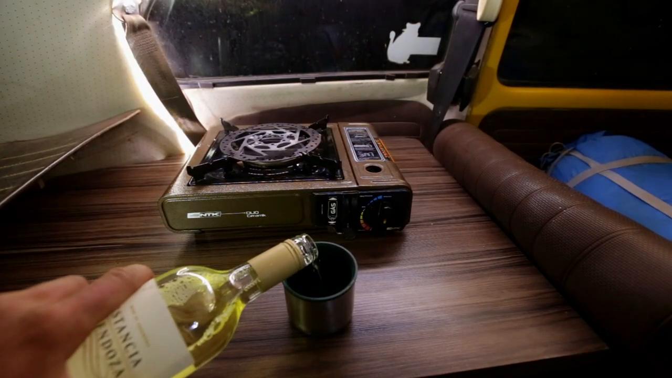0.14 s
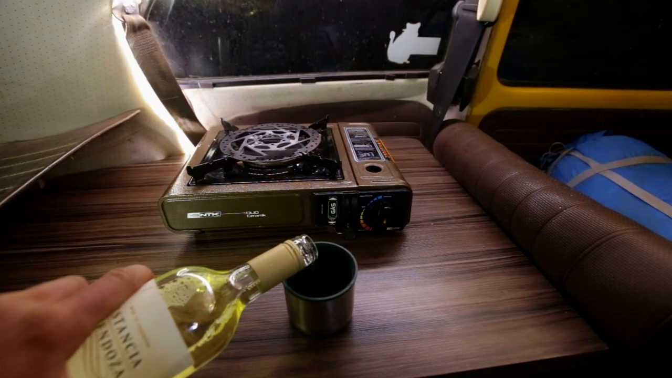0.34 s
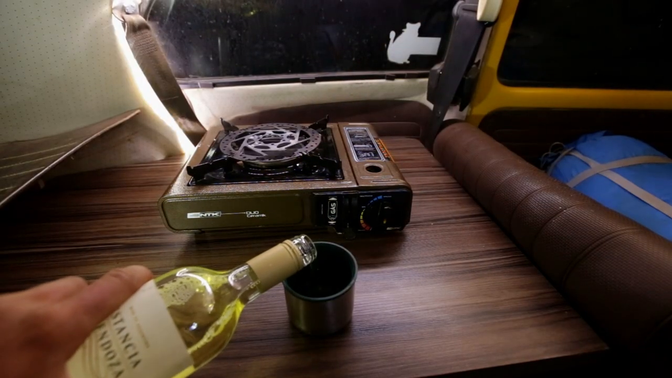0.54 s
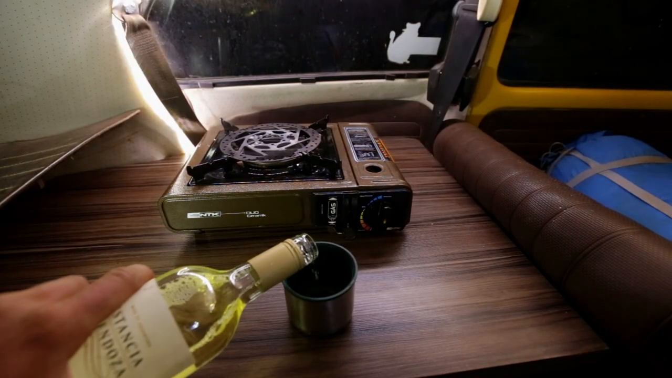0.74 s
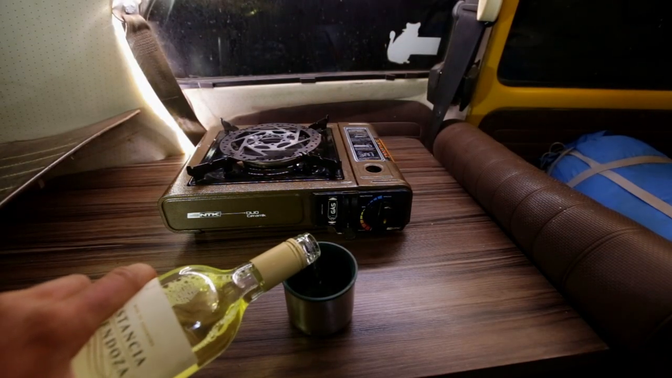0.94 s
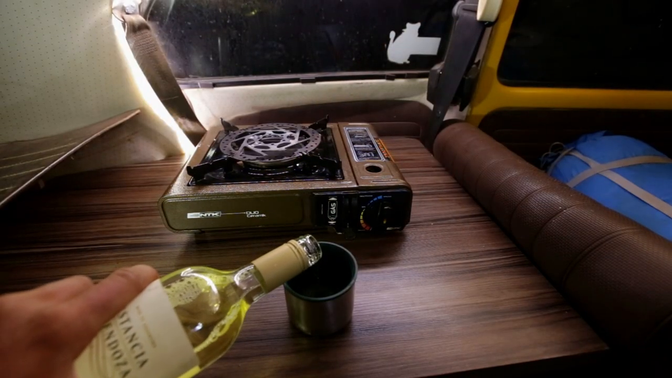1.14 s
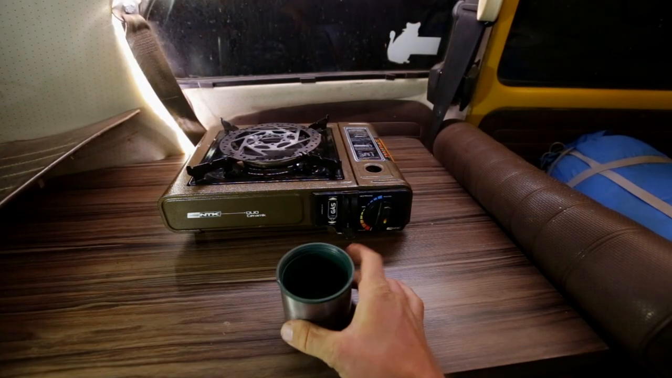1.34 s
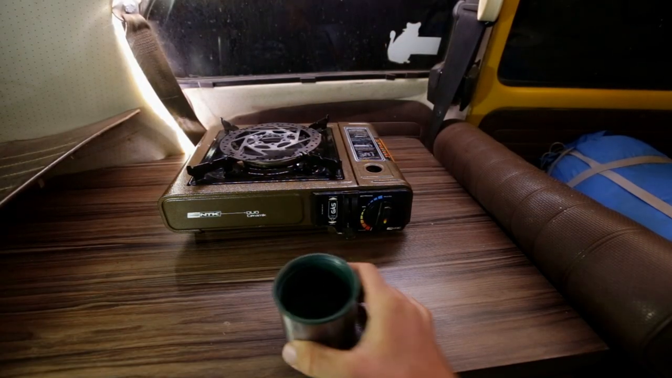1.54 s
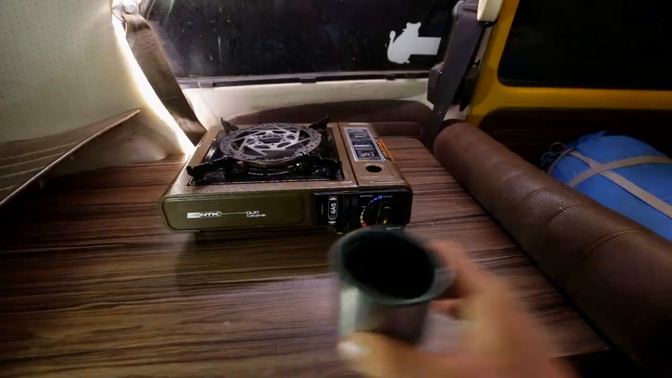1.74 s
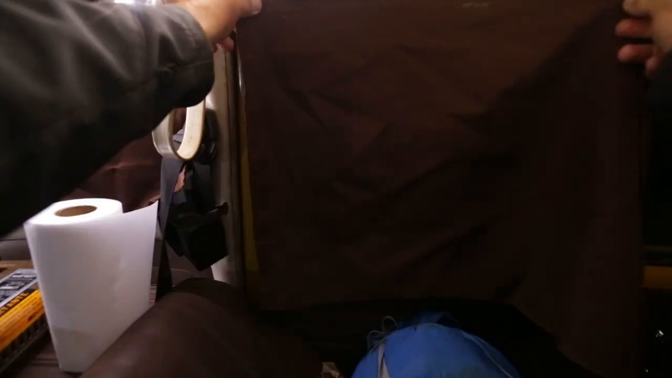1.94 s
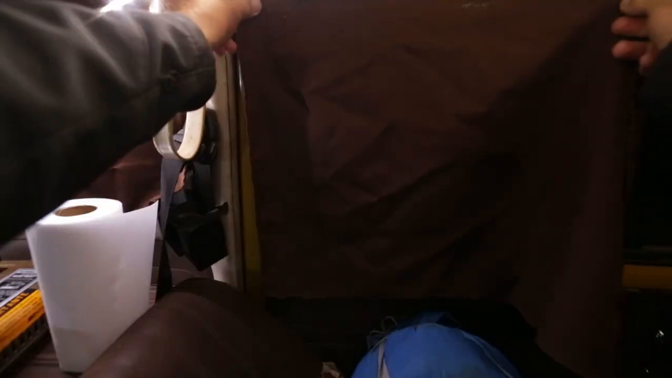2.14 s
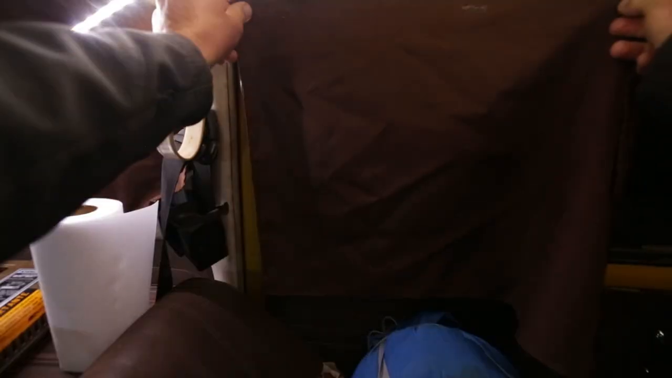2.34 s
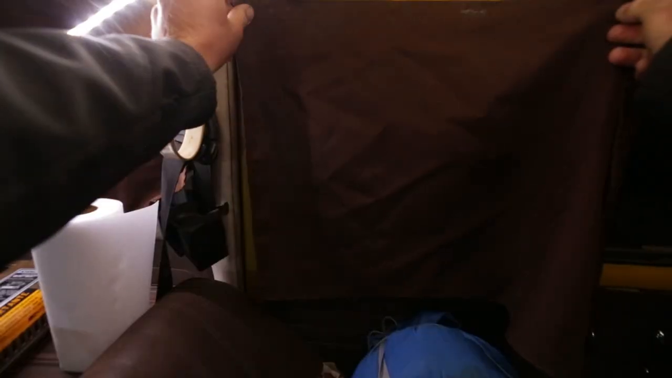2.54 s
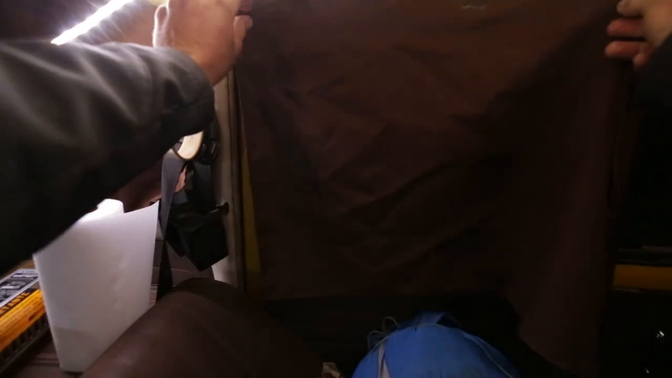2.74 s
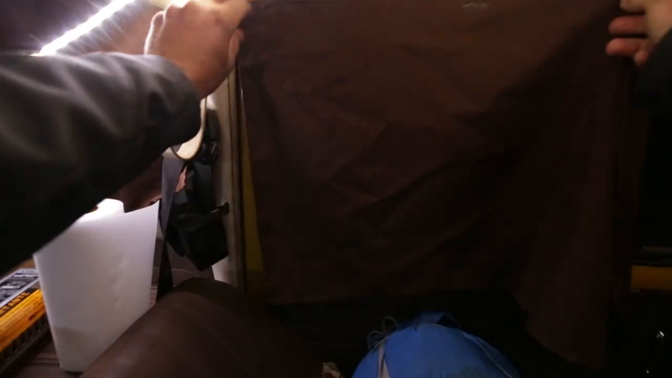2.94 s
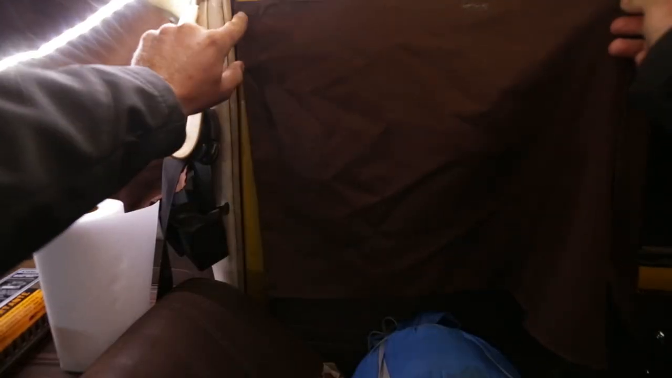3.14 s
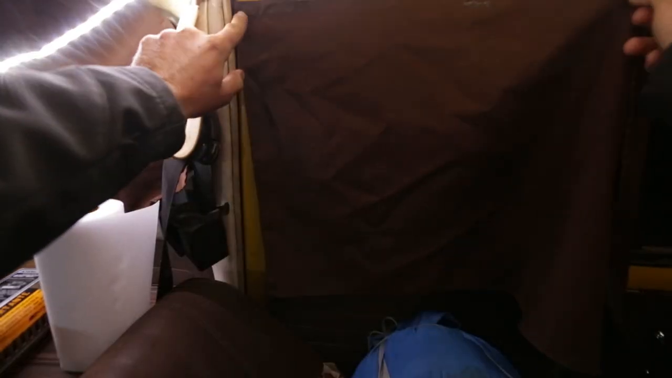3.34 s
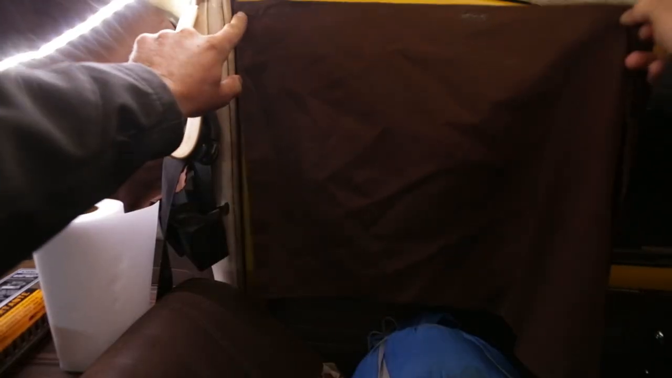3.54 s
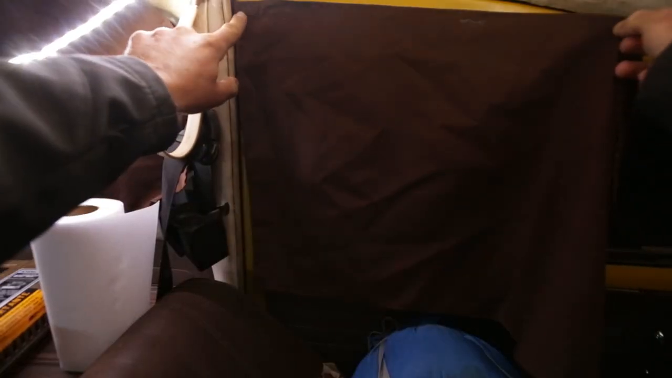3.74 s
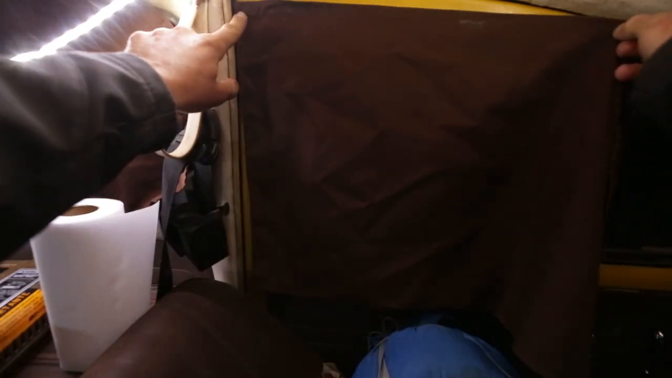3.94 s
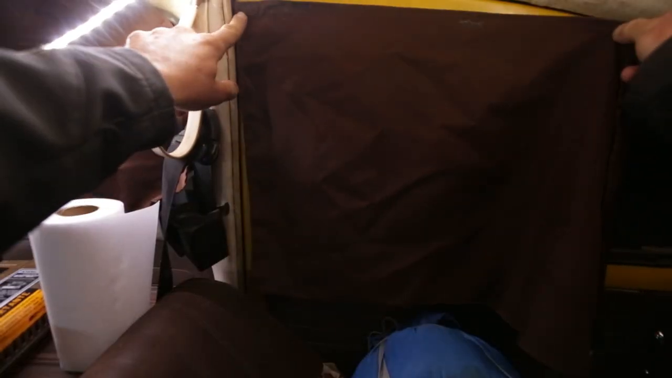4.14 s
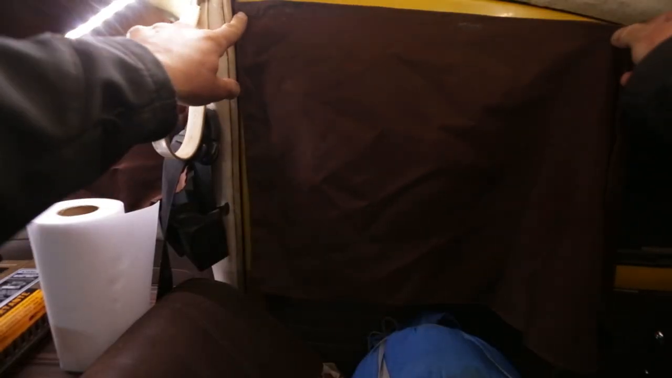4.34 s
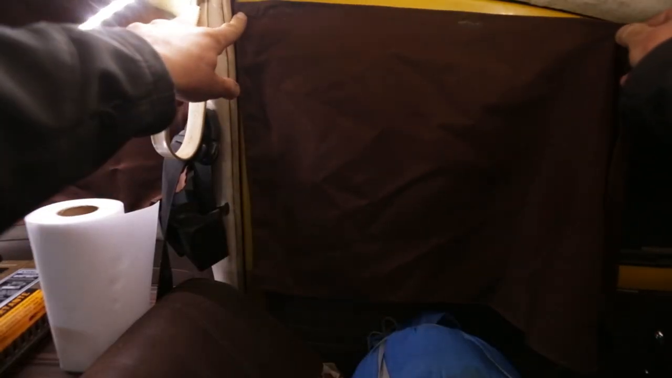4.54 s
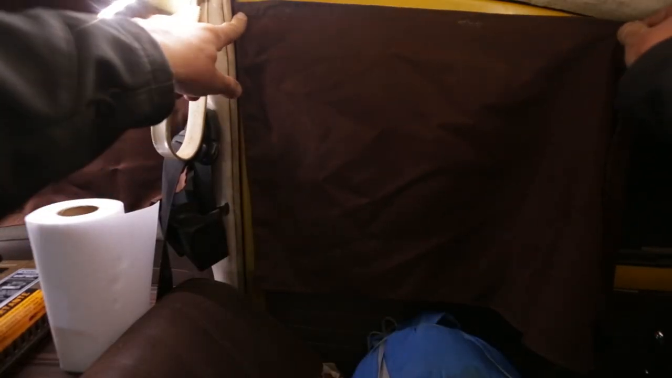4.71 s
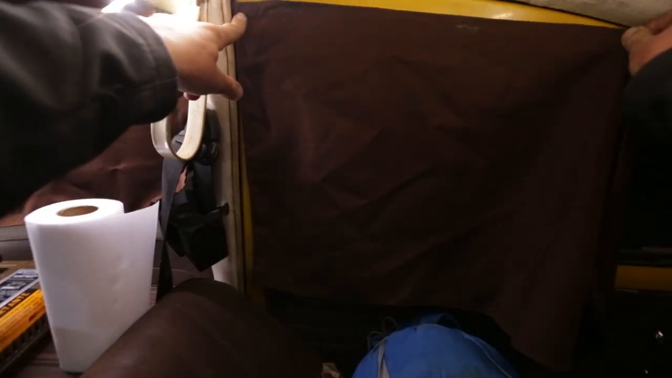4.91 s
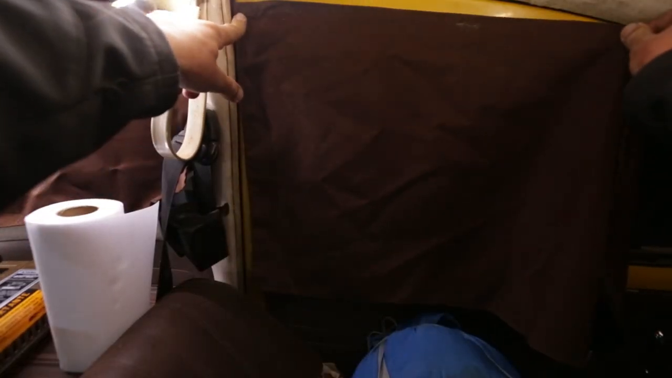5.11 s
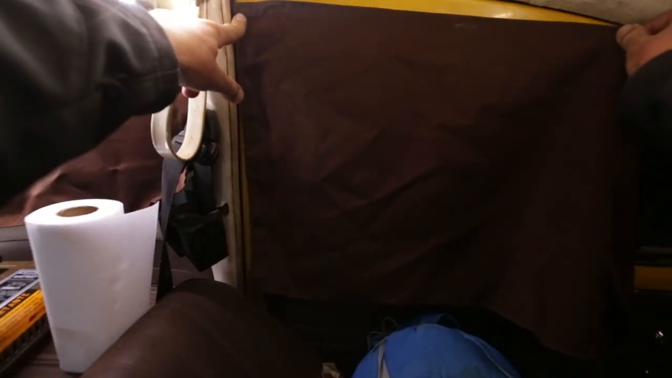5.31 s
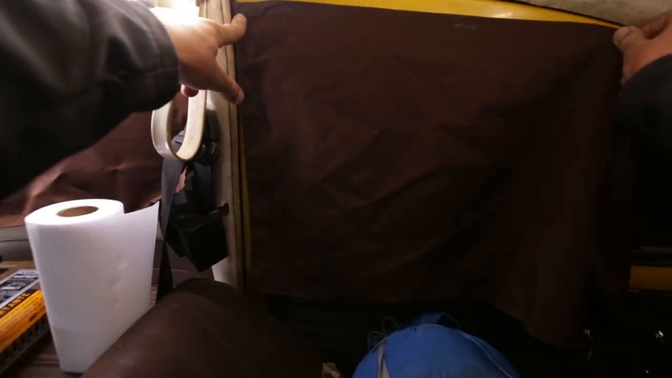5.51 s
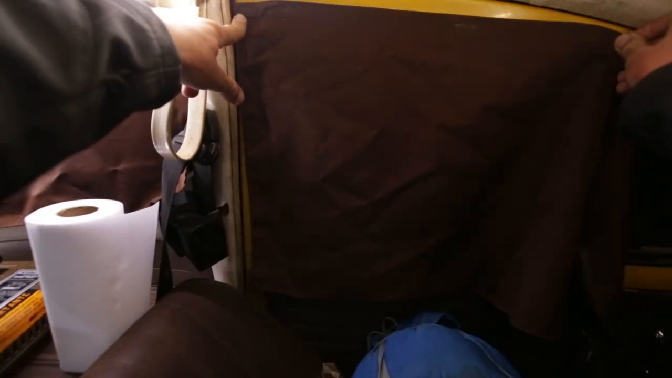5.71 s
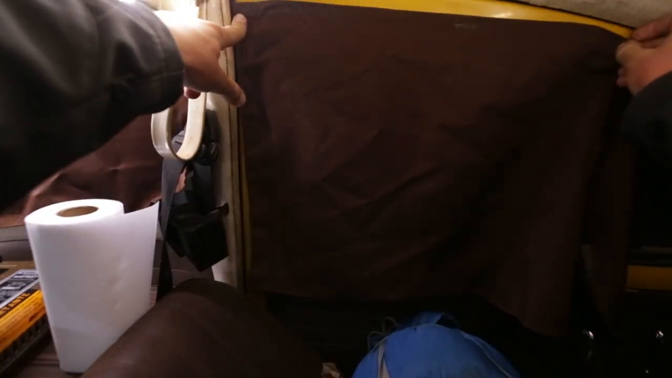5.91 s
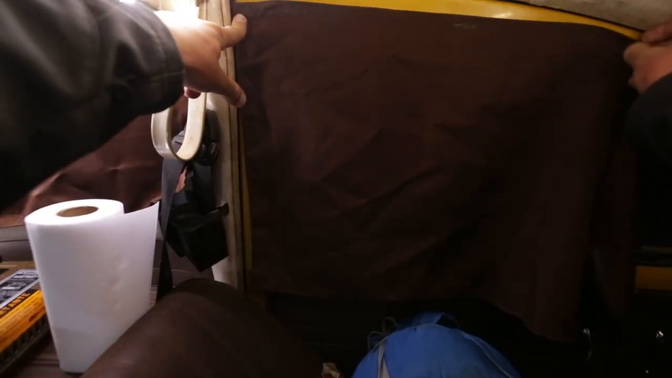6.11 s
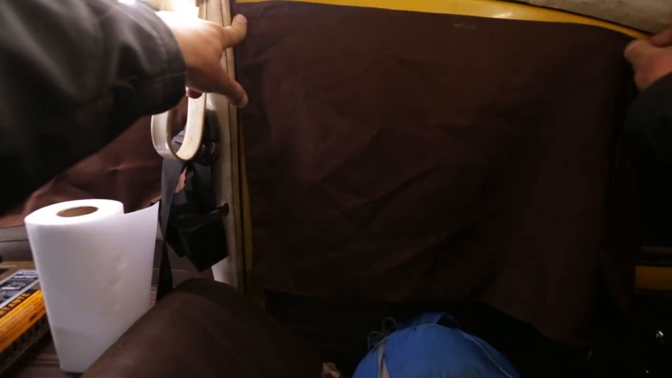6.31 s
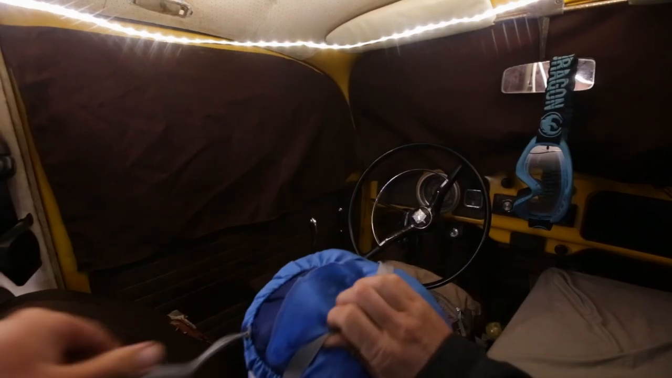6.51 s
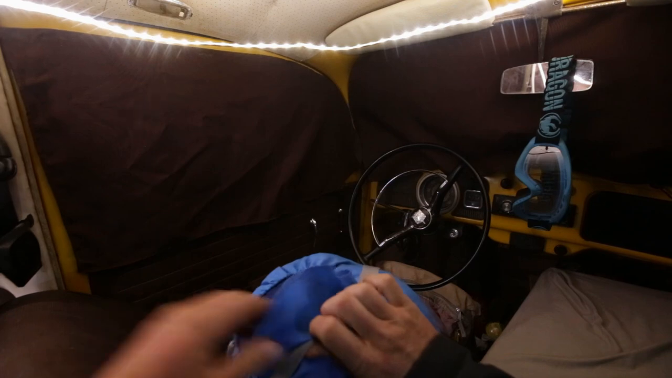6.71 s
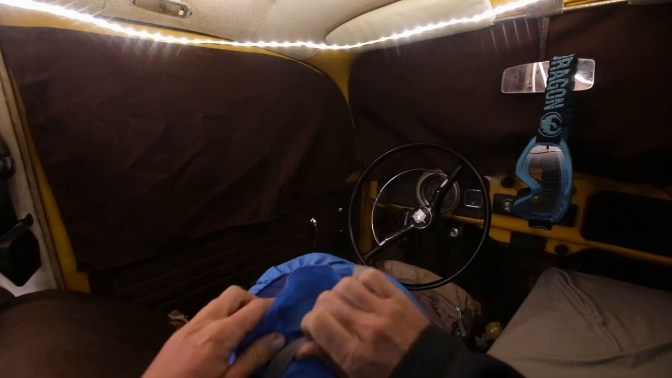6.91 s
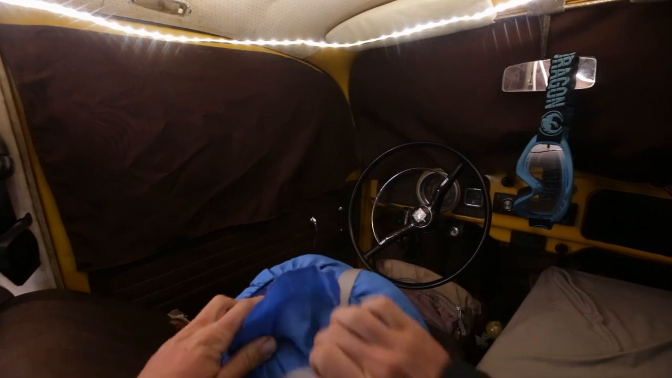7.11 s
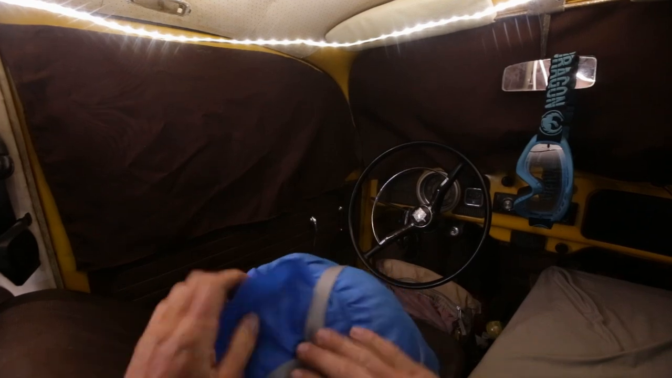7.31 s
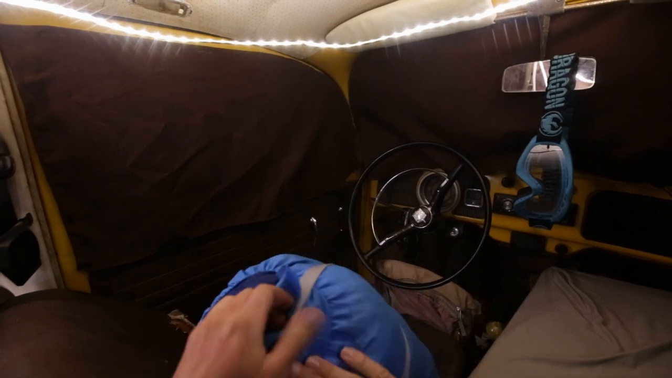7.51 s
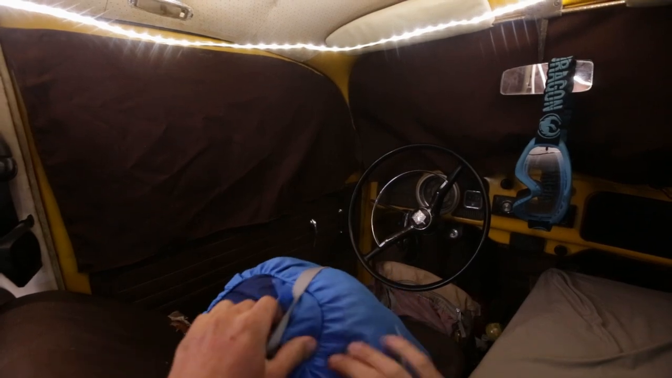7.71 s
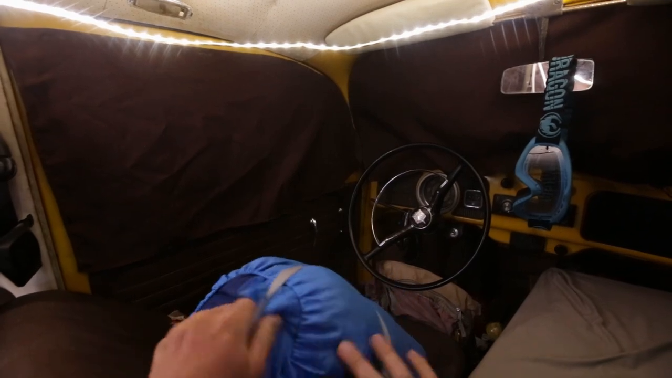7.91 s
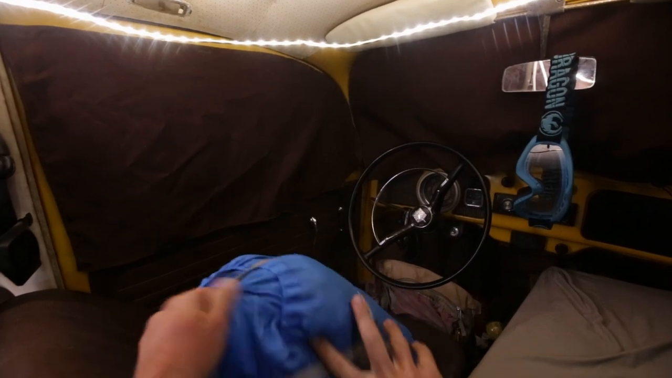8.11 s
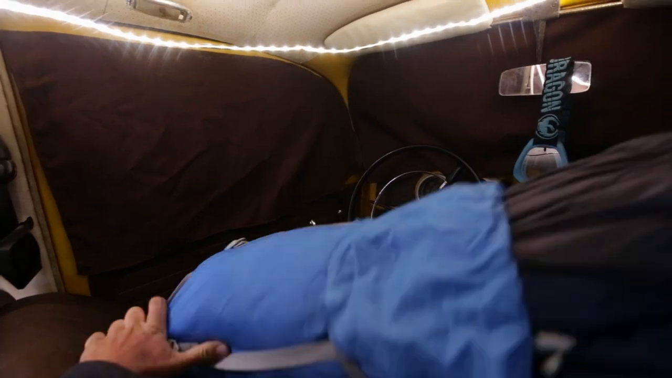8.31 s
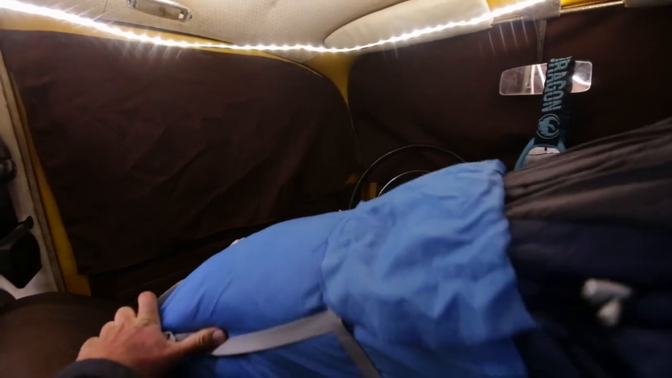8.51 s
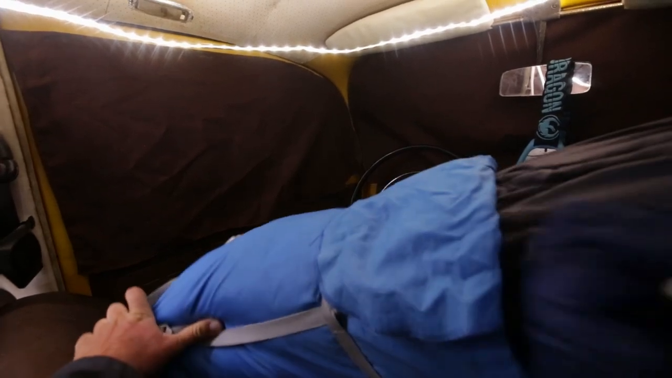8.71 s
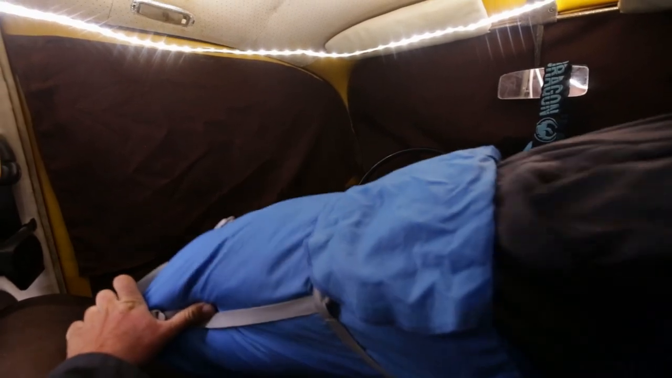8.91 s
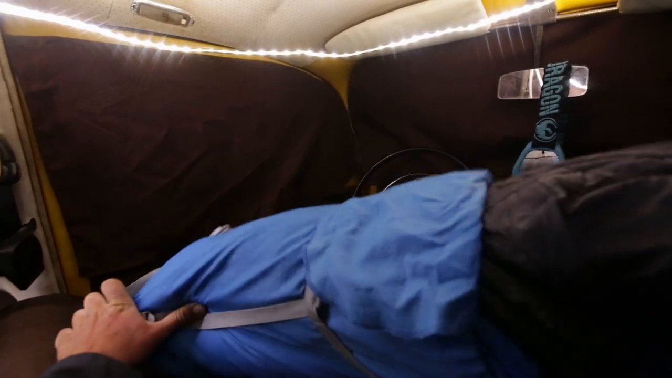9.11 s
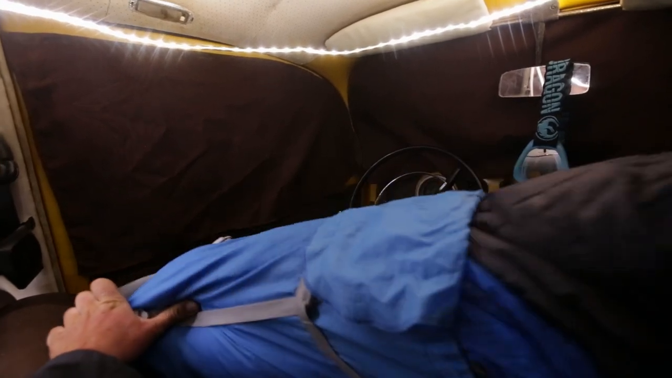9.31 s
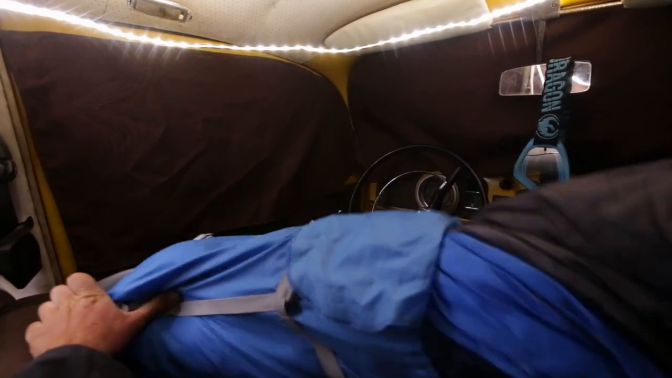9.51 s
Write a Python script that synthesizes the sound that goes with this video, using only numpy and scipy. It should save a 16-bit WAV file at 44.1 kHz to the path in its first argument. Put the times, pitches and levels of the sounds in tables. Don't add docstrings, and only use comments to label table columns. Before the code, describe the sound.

Close in a padded car: bubbly pouring into a metal cup, sharp magnetic clacks on bodywork, crinkling nylon, and a long fabric pull.

```python
import sys
import numpy as np
from scipy import signal
from scipy.fft import rfft, irfft
from scipy.io import wavfile
from scipy.ndimage import uniform_filter1d

SR = 44100
rng = np.random.default_rng(int(sys.argv[2]) if len(sys.argv) > 2 else 0)


def generate_wav(sig):
    pcm = np.round(np.clip(np.atleast_2d(sig).T, -1, 1) * 32767).astype(np.int16)
    wavfile.write(sys.argv[1], SR, pcm)


def invert_db(level):
    return 10 ** (np.asarray(level, dtype=float) / 20)


N = 421155
T = np.arange(N) / SR
BANDS_HZ = 50 * 2 ** np.arange(0, 8.4, 1 / 3)

# frequency in Hz, density in dB per Hz.
AIR_HZ_DB = [(8.8, -24), (15, -3), (190, -4), (233, -6), (277, -9), (321, -5.5), (361, -7.5), (646, -13),
             (816, -8), (1960, -12), (2330, -12.5), (14700, -15.5), (16000, -17)]
# frequency in Hz, density in dB per Hz.
HISS_HZ_DB = [(8.8, -41), (15, -1.5), (81, 0.5), (123, -9), (169, 1), (207, -5.5), (321, -4.5), (685, -9.5),
              (3720, -7.5), (14700, -8.5), (16000, -18)]
# frequency in Hz, t60 in seconds.
CABIN_HZ_T60_S = [(100, 1), (400, 0.36), (800, 0.13), (1600, 0.054), (3000, 0.058), (10000, 0.037)]
BLOW_HZ = (200, 900, 2700, 7500)

# time in seconds, level in dB.
POUR = [
    (0.0, -67),
    (0.072, -67),
    (0.38, -63.5),
    (0.698, -70),
    (1.3, -70.5),
]
# start in seconds, wall ring in dB, bubble pitch in Hz, bubble level in dB.
DROPS = [(0.0272, -54, 3500, -41), (0.0807, -72, 2600, -42), (0.0968, -61, 3000, -40),
         (0.1434, -56, 2600, -46), (0.1688, -51, 2800, -40), (0.212, -55, 1750, -68),
         (0.182, -58, 2000, -60), (0.235, -70, 3500, -51), (0.2633, -62, 2600, -53),
         (0.2997, -40, 2600, -39), (0.3393, -41, 3690, -38), (0.357, -41, 3200, -40),
         (0.392, -68, 3540, -35.5), (0.41, -38, 2020, -37), (0.444, -54, 2700, -41),
         (0.458, -43.5, 2020, -42), (0.488, -51, 2480, -40), (0.5275, -45.5, 2640, -50),
         (0.5504, -43, 2350, -46), (0.6055, -62, 3000, -49), (0.6858, -55, 2620, -51),
         (0.7153, -57, 3300, -55), (0.912, -65, 3300, -54), (1.02, -69, 3500, -45),
         (1.1553, -70, 2600, -56), (1.262, -56, 4000, -53), (0.652, -38.5, 2370, -37.5),
         (0.8584, -48, 2630, -41.5), (0.8775, -40, 1900, -52), (0.89, -38.5, 2350, -46),
         (0.932, -59, 1870, -39.5), (0.9637, -67, 2650, -47), (0.9848, -49, 3400, -56),
         (1.0077, -50, 2300, -47), (1.066, -47, 1840, -56), (1.088, -52, 1900, -52),
         (1.1943, -45.5, 1810, -47), (1.2109, -44, 2350, -44), (1.2296, -47.5, 1910, -48),
         (1.2467, -70, 1850, -43.5)]
# start in seconds, slap in dB.
GULPS = [
    (0.2129, -39),
    (0.357, -42.5),
    (0.392, -51),
    (0.651, -60),
    (1.0879, -59),
]
PLINKS_S = [.098, .12, .15, .17, .31, .407, .79]
# frequency in Hz, width in Hz, gain in dB.
CUP_MODES = [(203.6, 36, 2), (546, 57, -2), (713, 38, -6), (1000, 40, -31), (1310, 79, 7.5),
             (1910, 55, -20), (2660, 180, 1.5), (3260, 89, -9), (3520, 38, -20), (3620, 82, -18),
             (4500, 100, -28), (5300, 120, -27)]
# start in seconds, hold in seconds, rumble in dB, wall ring above it in dB.
SLIDE = [
    (1.335, 0.011, -57, 2),
    (1.39, 0.011, -61, 1),
    (1.49, 0.0085, -58, 11),
    (1.51, 0.03, -54, -14),
    (1.58, 0.062, -73, -20),
]

# start in seconds, peak at 1 kHz in dB, 200 Hz above it in dB, 2.6 kHz above it in dB.
TAPS = [(1.772, -54, -39, -7), (2.205, -49.5, 7.5, -29), (2.457, -46, -42, -4),
        (2.594, -57, -31, 4), (2.756, -55, -8, 3), (2.782, -54, 1, 23.5), (2.862, -59, 1, 2),
        (2.89, -56, -22, 2), (4.154, -45.5, -1, 3.5), (4.76, -62, -30, 18), (4.83, -47.5, -22, 6),
        (5.677, -44.5, -35, -2), (5.888, -40.5, -39, -19), (6.04, -57.5, -28, 7),
        (6.125, -65, -20, 18.5), (6.183, -58, -7, 3), (6.308, -42, -14, -7), (6.331, -36.5, -17, -1),
             (6.343, -41.5, -13, 0), (6.357, -51, -23, 18), (6.38, -36, -12, 2.5), (6.459, -47, 5.5, 4),
             (6.477, -42, -29, -10), (6.565, -41, -18, -1), (6.615, -55, -29, -22), (6.629, -40, -28, -12),
             (6.6795, -32.5, -5, -9), (6.6978, -34, -10, -9), (6.779, -38.5, -36, -19),
             (6.81, -37.5, -23, -6), (6.915, -39, -30, -22), (6.947, -54, -17, 13.5), (7.116, -50, -35, 8),
             (8.199, -33.5, -21, 2.5)]
# start in seconds, peak in dB, pitch in Hz.
KNOCKS = [(6.041, -52, 810), (6.428, -46, 560), (6.478, -50, 1000), (6.6155, -44, 775), (6.6295, -38, 730),
          (6.6808, -35, 616), (6.6985, -33, 477), (6.782, -44, 700), (6.812, -42.5, 600),
          (6.916, -39.5, 660)]

SNAP_S = [(1.9018, 1.9168), (3.8612, 3.8748, 3.8855), (5.2745, 5.279, 5.3135), (5.3165, 5.3186), (1.9252,),
          (3.8925,), (4.162,), (1.9216,)]
# peak at 1 kHz in dB, then 200 Hz, 2.6 kHz and 7 kHz above it in dB.
SNAPS = [
    [(-38.5, -22.5, -8.5, -14.5), (-14, -16, 2.5, -18.5)],
    [(-38, -43, 2, -26), (-42.5, -38, 12, -3), (-16.5, -29, 1.7, -11.5)],
    [(-29, -22, -1, -12.5), (-21.5, -25, -8, -19), (-30, -30, 1, -9)],
    [(-31.5, -26, -10, -17), (-26.5, -25, -9, -20)],
    [(-23.5, -22.5, -15.5, -24)],
    [(-32.5, -19, -11, -15)],
    [(-51, 5, -15, -25)],
    [(-30, -30, 3, -12)],
]
# frequency in Hz, level in dB, t60 in seconds.
PANELS = [
    [(388, -13.5, 0.28), (434, -24, 0.25), (490, -23.5, 0.06), (628, -9, 0.13), (716, -22, 0.032),
     (835, -15.5, 0.05), (1000, 2.5, 0.015), (1200, -17.5, 0.06), (1448, -12.5, .025), (1570, -7.5, 0.033),
     (2350, -8.5, 0.023), (2480, 12, 0.011), (3000, -6, .03)],
    [(389, -6, 0.29), (560, -37, 0.0567), (663, -1.5, 0.085), (678, -19, 0.073), (1050, -1, 0.039),
     (1250, -10, .015), (1510, -21, 0.048), (2000, -14.5, 0.05), (2700, -35, 0.035), (3000, -31.5, 0.02),
     (4160, 0.5, 0.014), (4450, 12, 0.012), (5170, 15.5, 0.019)],
    [(388.6, -5, 0.25), (543, -8, 0.077), (660, -17, 0.063), (865, -10, 0.018), (1040, -4, 0.052),
     (1290, -21, 0.063), (1590, 4.5, 0.034), (2340, -1.5, 0.034), (3300, -8, 0.025)],
    [(840, -14, 0.12), (880, 3.5, 0.032), (1008, -10.5, 0.09), (915, -29, 0.26), (1614, -14, 0.05)],
    [(640, -1, .04), (700, 3.5, .06), (880, -17.5, .14)],
    [(600, -2, .04), (653, 3, 0.066), (720, -5.5, 0.041)],
    [(345, 0.5, 0.19), (305, -4.5, 0.24), (700, -11, 0.1), (760, -18, .09)],
    [(1470, 0, .02), (1610, -3.5, .03), (2250, -1, 0.023), (3300, -2, 0.016)],
]
PANEL_DB = (-12, -21, -12, 4.5, -5, -1.5, 3.5, 7.5)

# start in seconds, peak
# in dB, pitch in Hz.
THUMPS = [(1.93, -47, 192), (2.206, -45.5, 140), (2.794, -47, 136), (3.049, -56, 118), (3.168, -59, 51.5),
          (3.219, -63, 51.6), (4.163, -47, 200), (5.286, -41.5, 177), (5.467, -51, 199), (6.327, -50, 123),
          (6.352, -45, 125), (6.457, -45, 140), (6.681, -52, 188), (6.809, -43.5, 149), (7.57, -57, 117),
          (6.385, -52, 130), (8.195, -47, 150), (8.366, -54, 121)]

# frequency in Hz, density in dB per Hz.
WEAVE_HZ_DB = [(24, -56), (40, -33), (115, -12.5), (320, -6.5), (412, 2), (680, -3.5), (1070, 0),
               (2000, -1), (2380, 0.5), (3740, -7), (9940, -31), (12100, -31), (16000, -41)]
# frequency in Hz, density in dB per Hz.
SACK_HZ_DB = [(24, -51), (40, -24.5), (124, -8.5), (231, -6.5), (770, -1.5), (918, -0.5), (2770, 0.5),
              (4340, -6.5), (5050, -8.5), (5720, -23), (6330, -18.5), (16000, -47.5)]
# time in seconds, level in dB.
CURTAIN = [(1.97, -80.5), (2.3, -78), (2.9, -77.5), (3.8, -80.5), (4.6, -78), (5.7, -76.5), (6.15, -68)]
# start in seconds, hold in seconds, level in dB, dull part above it in dB.
BRUSHES = [(1.97, 0.013, -69.5, 18), (2.23, 0.041, -70.5, 5), (2.38, 0.19, -72.5, -5),
           (2.77, .01, -65.5, -8), (2.845, 0.035, -66, -9), (3.13, 0.062, -70, 3.5), (4.43, 0.026, -73, -6),
           (4.77, .01, -71, -6), (4.83, 0.017, -65.5, -7)]
# start in seconds, hold in seconds, level in dB, treble above it in dB.
GRABS = [(6.29, .095, -55, -13), (6.41, 0.09, -65, -4), (6.575, 0.011, -59, -14), (6.655, 0.019, -55, -8.5),
         (6.785, 0.01, -53, -15), (6.875, 0.0054, -53.5, -16), (6.95, 0.0078, -48.5, -14),
         (7.02, 0.074, -49, -18), (7.13, 0.1, -47.5, -12.5), (7.3, 0.035, -53, -14),
         (7.37, 0.0047, -48.5, -12.5), (7.43, 0.06, -49.5, -16.5), (7.575, 0.015, -50, -21)]
# time in seconds, level in dB, treble above it in dB.
PULL = [(7.62, -60, -18), (7.7, -54, -12), (7.77, -48, -9), (7.82, -49, -12.5), (7.93, -51.5, -16),
        (7.96, -48, -11), (8.1, -51, -14.5), (8.18, -49.5, -11.5), (8.27, -47.5, -11.5), (8.35, -38, -15),
        (8.55, -41.5, -12.5), (8.67, -40, -14.5), (8.75, -42.5, -16), (9.02, -39, -13.5),
        (9.18, -41, -14.5), (9.55, -37, -11.5)]
# frequency in Hz, sharpness (Q).
SHADOWS = [(4300, 4), (5850, 6), (7400, 9)]
SACK_S, SMOOTH_S, PULL_S = 6.15, 6.98, 8.29

# start in seconds, length in seconds, pitch in Hz, level in dB.
SQUEAK = [(2.418, .032, 1080, -44.5)]
# start in seconds, peak in dB.
SNICKS = [(6.7416, -40), (6.769, -36), (6.7874, -43), (6.8523, -38), (6.933, -41), (6.9456, -38),
          (6.952, -38), (6.9574, -35), (7.0164, -38), (7.1171, -32), (7.3004, -38), (7.3662, -35.5),
          (7.4225, -35), (7.568, -35.5), (7.67, -44), (7.6866, -38), (7.9438, -41), (8.2003, -33),
          (8.2394, -37), (8.3507, -37), (8.3594, -38), (8.8914, -37)]


def unit(x):
    return x / np.sqrt(np.mean(x ** 2))


def on_log(hz, table):
    f, v = np.transpose(table)
    return np.interp(np.log(hz), np.log(f), v)


def curve(rows):
    s, db, *rest = np.transpose(rows)
    level = np.interp(T, s, invert_db(db), left=0, right=0)
    return [level] + [np.interp(T, s, c) for c in rest]


def band(x, hz):
    sos = signal.butter(2, [hz / 2 ** (1 / 6), hz * 2 ** (1 / 6)], "band", fs=SR, output="sos")
    return signal.sosfilt(sos, x) * np.sqrt(SR / 2 / (.25 * hz))


def no_bass(x, hz):
    return signal.sosfilt(signal.butter(3, hz, "high", fs=SR, output="sos"), x)


def ring(x, hz, t60_s):
    pole = np.exp(2j * np.pi * hz / SR - np.log(1000) / (t60_s * SR))
    return signal.lfilter([1], [1, -pole], x).imag


def resonate(x, modes):
    out = 0
    for hz, width_hz, db in modes:
        t60_s = np.log(1000) / (np.pi * width_hz)
        out = out + invert_db(db) * width_hz * 2 * np.pi / SR * ring(x, hz, t60_s)
    return out


def ticks(s, size):
    x = np.zeros(N)
    np.add.at(x, np.clip((np.asarray(s) * SR).astype(int), 0, N - 1), size)
    return x


def fade(x, t60_s):
    return signal.lfilter([1], [1, -np.exp(-np.log(1000) / (t60_s * SR))], x)


def walk(rate_hz):
    k = int(SR / rate_hz)
    steps = np.repeat(rng.standard_normal(N // k + 1), k)
    return unit(uniform_filter1d(steps, k)[:N])


def coloured(table):
    hz = np.maximum(np.fft.rfftfreq(N, 1 / SR), 1)
    return unit(irfft(rfft(rng.standard_normal(N)) * invert_db(on_log(hz, table)), N))


def crackle(rate_hz, spread_db):
    chance, sign, size = rng.random((3, N))
    return unit((chance < rate_hz / SR) * np.sign(sign - .5) * invert_db(-spread_db * np.log(size + 0.031)))


def cabin(x, echo_db, t60_s):
    t = np.arange(2048) / SR
    sparse = rng.standard_normal(len(t)) * (rng.random(len(t)) < .08)
    echoes = sparse * invert_db(-60 * t / t60_s) * (t > .0012)
    echoes = echoes * invert_db(echo_db) / np.sqrt(np.sum(echoes ** 2))
    echoes[0] = 1
    return signal.fftconvolve(x, echoes)[:N]


def blows(rows, hold_s, shorten, gain_db, top_db, click, size=N, longest_s=1):
    s, db, low_db, high_db, top_tilt_db = np.transpose(rows)
    out, hold = np.zeros(N), max(int(hold_s * SR), 1)
    points = np.transpose([low_db, 0 * db, high_db, top_tilt_db])
    for hz in BANDS_HZ[4:]:
        tilt_db = [np.interp(np.log(hz), np.log(BLOW_HZ), p) for p in points]
        edge_db = -14 * max(np.log2(160 / hz), 0) + top_db * max(np.log2(hz / BLOW_HZ[-1]), 0)
        hit = ticks(s, invert_db(db + tilt_db + edge_db + gain_db))[:size]
        t60_s = min(shorten * on_log(hz, CABIN_HZ_T60_S), longest_s)
        shape = fade(hit, 0.82 * t60_s)
        rattle = np.cumsum(shape)
        rattle[hold:] = rattle[hold:] - rattle[:-hold]
        shape = shape + 1.4 * rattle / hold + 0.2 * fade(hit, 3.0 * t60_s)
        lead = int(SR / max(hz, 700))
        out[:size] += np.roll(band(shape * rng.standard_normal(size), hz), -lead)
    for k, (hz, tilt_db) in enumerate(zip(BLOW_HZ, [low_db, 0 * db, high_db, top_tilt_db - 4])):
        wide = signal.butter(2, [hz / 1.8, hz * 1.8], "band", fs=SR, output="sos")
        sign = (-1) ** k
        edge = sign * click * 2 * SR / hz * ticks(s, invert_db(db + tilt_db + gain_db))
        out += signal.sosfilt(wide, edge)
    return out


def bubble(x, s, hz, db, t60_s, glide):
    t = np.arange(int(t60_s * SR)) / SR
    i = int(s * SR)
    x[i:i + len(t)] += invert_db(db - 60 * t / t60_s) * np.sin(2 * np.pi * hz * t * (1 + glide * t / t60_s))


def strokes(rows, rise_db_s, fall_db_s):
    s, hold_s, db, colour_db = np.transpose(rows)[:, :, None]
    t = T[::32]
    rise_db = rise_db_s * np.maximum(s - t, 0)
    fall_db = fall_db_s * np.maximum(t - s - hold_s, 0)
    return invert_db(db - rise_db - fall_db), colour_db


def blend(gains, colour_db, under, under_db):
    t = T[::32]
    power = np.interp(T, t, np.sum(gains ** 2, axis=0)) + under ** 2 + 1e-18
    tint = np.interp(T, t, np.sum(gains ** 2 * colour_db, axis=0)) + under ** 2 * under_db
    return np.sqrt(power), tint / power


def air():
    return invert_db(-68) * coloured(AIR_HZ_DB)


def hiss():
    return invert_db(-70.5) * coloured(HISS_HZ_DB)


def wine_bubbles(flow):
    s, _, hz, bubble_db = np.transpose(DROPS)
    fizz = np.zeros(N)
    for at, f, db, (u, v) in zip(s, hz, bubble_db, rng.random((len(s), 2))):
        bubble(fizz, at, f, db - 8.5, t60_s=0.021, glide=0.082)
        bubble(fizz, at + 0.0049 * u, 1600 * 2 ** (1.3 * v), db - 24.0, t60_s=0.0089, glide=0.16)
    for at in PLINKS_S:
        bubble(fizz, at, 5220, -59.5, t60_s=.014, glide=.02)
    for u, v, w, late in rng.random((170, 4)):
        at = s[int(u * len(s))] - .025 * np.log(late + .02)
        db = 2.5 - 4 * np.log(w + .05) + 20 * np.log10(flow[int(at * SR)] + 1e-9)
        octaves = (1.3 - .4 * at) * v ** 1.5
        bubble(fizz, at, 2100 * 2 ** octaves, db, t60_s=0.013, glide=.15)
    return fizz


def cup_wall():
    s, ring_db, _, _ = np.transpose(DROPS)
    gulp_s, gulp_db = np.transpose(GULPS)
    wall = np.zeros(N)
    for at, db, (u, v) in zip(s, ring_db, rng.standard_normal((len(s), 2))):
        bubble(wall, at, 1280 * (1 + .012 * u), db - 5, t60_s=.05 * invert_db(2 * v), glide=.005)
    return wall + ring(ticks(gulp_s, invert_db(gulp_db - 4)), 970, 0.026)


def pour():
    s, ring_db, _, bubble_db = np.transpose(DROPS)
    gulp_s, gulp_db = np.transpose(GULPS)
    flow, = curve(POUR)
    slap_db = -52 + 0.89 * (ring_db + 51.0)
    slap = ticks(s, invert_db(slap_db)) + ticks(gulp_s, invert_db(gulp_db))
    stream = flow * crackle(500, 4.8)
    push = invert_db(34.0) * slap + invert_db(17.0) * stream
    table = 0
    for hz, width_hz, db in CUP_MODES[:4]:
        foot = resonate(push, [(hz, width_hz, db)])
        table = table + resonate(foot, [(hz, 2.0 * width_hz, 0)])
    metal = resonate(invert_db(5) * stream * invert_db(4 * walk(40)), CUP_MODES[4:])
    splash = np.transpose([s, ring_db, -22 + 0 * s, bubble_db - ring_db, -22 + 0 * s])
    spray = blows(splash, 0.0075, 0.32, -19, -8, 0.18, size=2 * SR)
    wet = cabin(wine_bubbles(flow) + metal, -2.5, 0.055)
    return no_bass(wet + no_bass(cup_wall(), 770) + table, 188) + no_bass(spray, 1450)


def slide():
    gains, colour_db = strokes(SLIDE, rise_db_s=280, fall_db_s=400)
    rumble, sing_db = blend(gains, colour_db, 0, 0)
    slips = crackle(2500, 2.4)
    soft = rumble * unit(fade(slips, 0.0016))
    body = resonate(soft, [(215, 15, 13.0), (273, 55, 5.5), (566, 45, 5.2), (850, 150, 5.1), (1000, 58, 2.1)])
    sing = unit(no_bass(resonate(slips, [(1316, 61, 0)]), 1800))
    rasp = unit(resonate(slips, [(2370, 680, 0), (2790, 650, -1), (3500, 470, 4), (5200, 1100, -11)]))
    return no_bass(body + rumble * (invert_db(-6) * rasp + invert_db(sing_db - 6.5) * sing), 200)


def taps():
    rows = np.array(TAPS)
    top_db = -12.5 + 0.79 * rows[:, -1]
    rows = np.column_stack([rows[:, 0] + 0.00102, rows[:, 1:], top_db])
    hollow = np.zeros(N)
    for s, db, hz in KNOCKS:
        bubble(hollow, s, hz, db, t60_s=0.025, glide=-.05)
    return blows(rows, 0.0043, 0.53, -19, -7, 1.16, longest_s=0.056) + hollow


def magnets():
    rows = np.column_stack([sum(SNAP_S, ()), sum(SNAPS, [])])
    out = no_bass(blows(rows, 0.0026, 0.51, -18.5, top_db=-7, click=1.5), 490)
    for s, hits, modes, db in zip(SNAP_S, SNAPS, PANELS, PANEL_DB):
        start = int(s[0] * SR)
        near = slice(start, start + SR // 2)
        push = cabin(ticks(s, invert_db(np.transpose(hits)[0] + db)), -8.5, 0.01)[near]
        out[near] += sum(invert_db(mode_db) * ring(push, hz, t60_s) for hz, mode_db, t60_s in modes)
    return no_bass(out, 240)


def thumps():
    out = sum(ring(ticks([s], invert_db(db)), hz, t60_s=0.099) for s, db, hz in THUMPS)
    return np.convolve(out, np.hanning(200) / 100)[:N]


def curtain_motion():
    gains, colour_db = strokes(BRUSHES, rise_db_s=151.5, fall_db_s=154)
    return blend(gains, colour_db, *curve(CURTAIN), 0)


def sack_motion():
    pull, pull_top_db = curve(PULL)
    loose = T > PULL[0][0]
    rest = np.where(loose, pull, invert_db(-70) * (T > SACK_S))
    rest_top_db = np.where(loose, pull_top_db, -13)
    gains, colour_db = strokes(GRABS, rise_db_s=241, fall_db_s=330)
    return blend(gains, colour_db, rest, rest_top_db)


def cloth():
    curtain, dull_db = curtain_motion()
    nylon, top_db = sack_motion()
    depth = np.where(T < SMOOTH_S, .8, .45)
    creases = 1 + depth * unit(fade(np.abs(crackle(500, 3.5)), .0025))
    shared_db, out = .7 * walk(30), 0
    for hz in BANDS_HZ:
        low, top = np.clip(np.log2(1500 / hz), 0, 1), np.clip(np.log2(hz / 3500), 0, 1)
        colour_db = np.where(T < PULL_S, on_log(hz, SACK_HZ_DB) + 0.66, on_log(hz, WEAVE_HZ_DB))
        tilt_db = np.where(T < SACK_S, low * (dull_db + 7.5), top * (top_db + 18.0))
        flicker_db = shared_db + (.7 + 1.0 * low) * walk(25)
        db = colour_db + 10 * np.log10(hz / 1000) + tilt_db + flicker_db
        out = out + invert_db(db - 14.0) * band(creases * rng.standard_normal(N), hz)
    out = out + invert_db(-18.5) * unit(resonate(crackle(160, 5), [(1510, 1400, -0.5), (3120, 1100, 0.0)]))
    shaded = out
    for hz, sharpness in SHADOWS:
        shaded = signal.lfilter(*signal.iirnotch(hz, sharpness, SR), shaded)
    in_hands = (T > SACK_S) & (T < PULL_S)
    rub = np.where(in_hands, .3 * out + .7 * shaded, out)
    return (curtain * (T > SNAP_S[0][0]) + nylon) * rub


def squeak():
    (s, length_s, hz, db), = SQUEAK
    shape = np.clip(1 - abs(2 * (T - s) / length_s - 1), 0, 1)
    tone = np.sin(2 * np.pi * hz * T + 0.67 * walk(250)) * (1 + 0.27 * walk(300))
    scrub = unit(resonate(crackle(3000, 3), [(1310, 170, 3), (2650, 280, -1)]))
    return invert_db(db) * shape * (invert_db(-2.5) * tone + invert_db(-9) * scrub)


def snicks():
    s, db = np.transpose(SNICKS)
    click = resonate(ticks(s, invert_db(db + 9.5)), [(1500, 1600, 7.5), (3000, 1150, 0), (6400, 3300, -19.5)])
    return cabin(no_bass(click, 400), -6, .012)


def scene():
    cup = pour() + slide()
    hands = taps() + thumps() + cloth() + squeak() + snicks()
    mid = air() + cup + magnets() + hands
    side = hiss()
    return np.array([mid + side, mid - side])


def band_limit(x):
    return signal.sosfilt(signal.butter(12, 16480, fs=SR, output="sos"), x)


def record(dry):
    top_hz = 15780
    mix = signal.sosfilt(signal.ellip(10, .2, 60, top_hz, fs=SR, output="sos"), dry)
    return band_limit(mix)


dry = scene()
out = record(dry)
generate_wav(out)
```